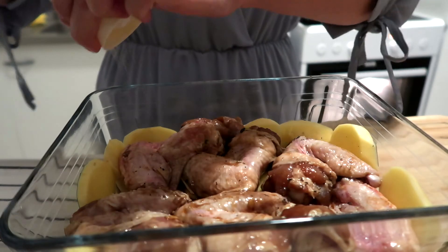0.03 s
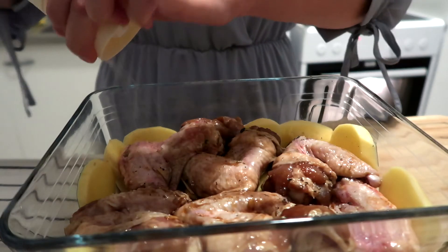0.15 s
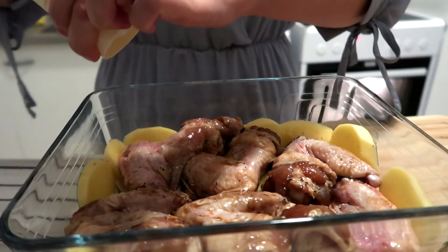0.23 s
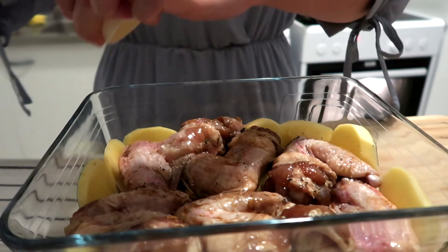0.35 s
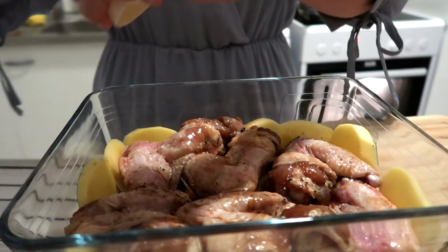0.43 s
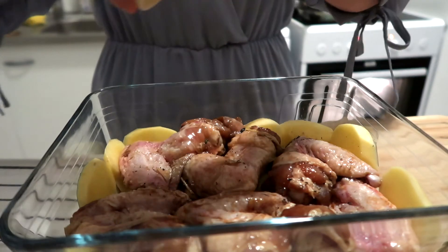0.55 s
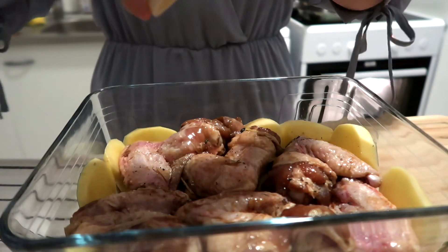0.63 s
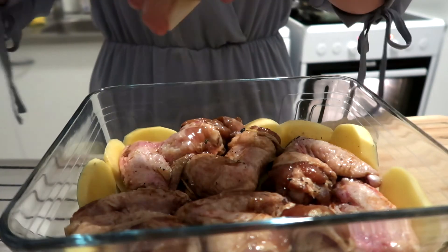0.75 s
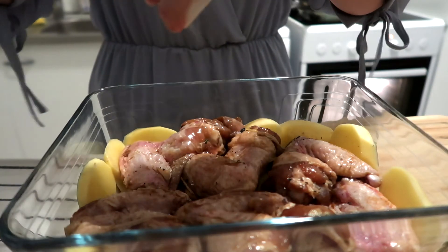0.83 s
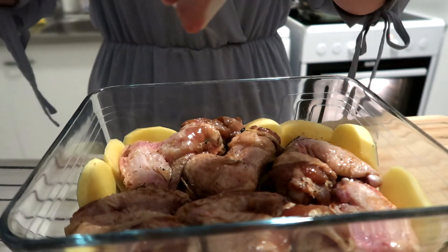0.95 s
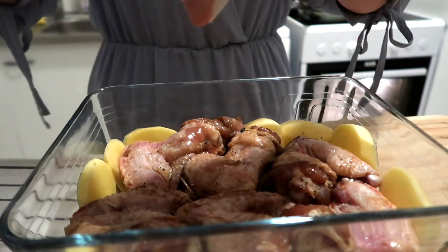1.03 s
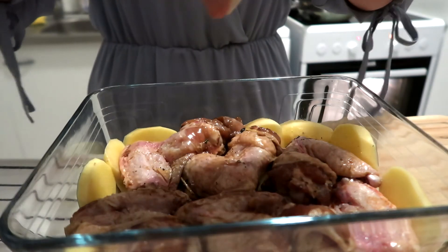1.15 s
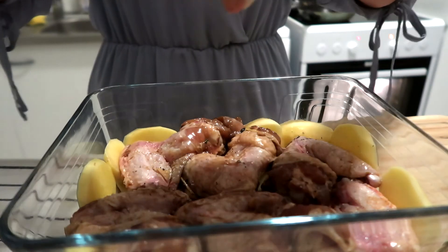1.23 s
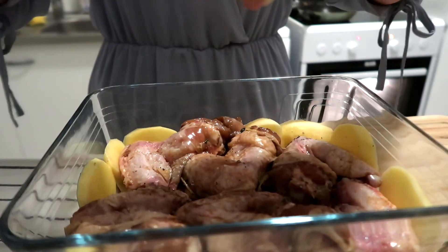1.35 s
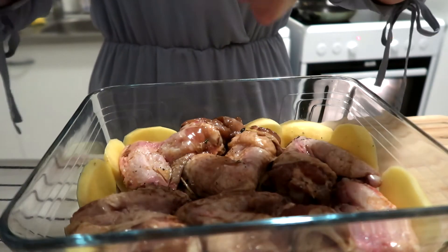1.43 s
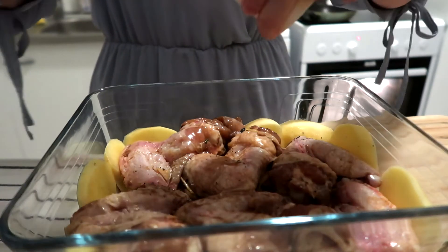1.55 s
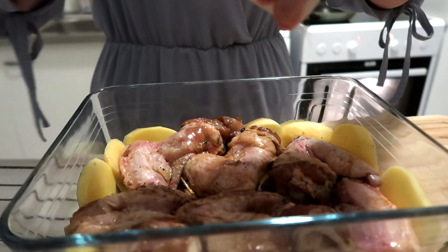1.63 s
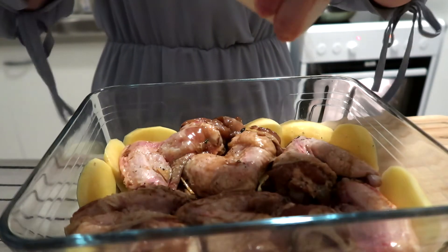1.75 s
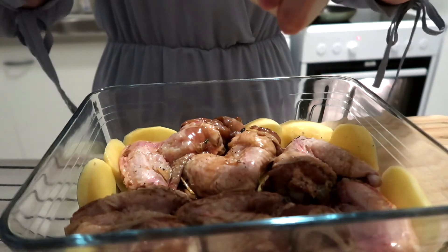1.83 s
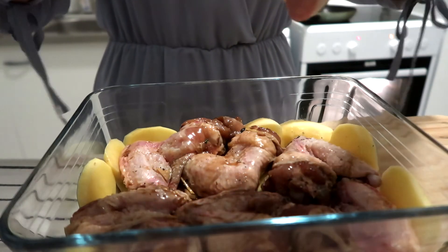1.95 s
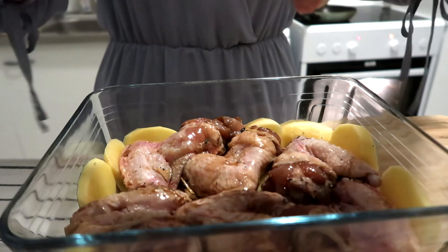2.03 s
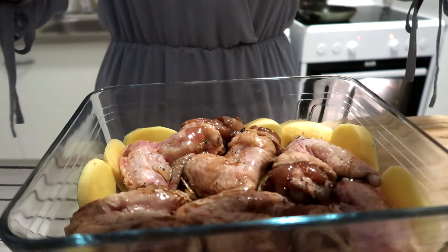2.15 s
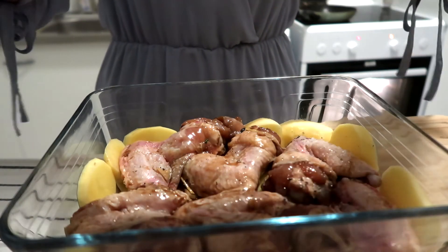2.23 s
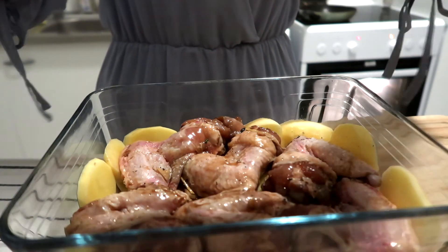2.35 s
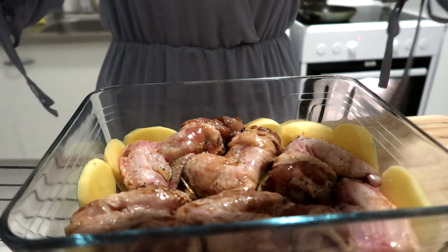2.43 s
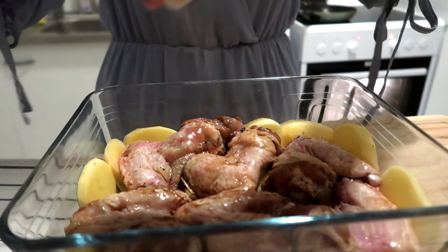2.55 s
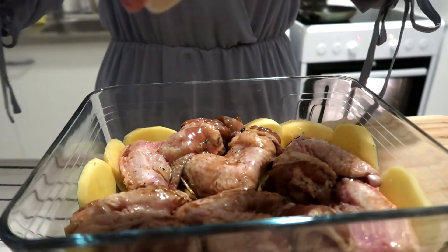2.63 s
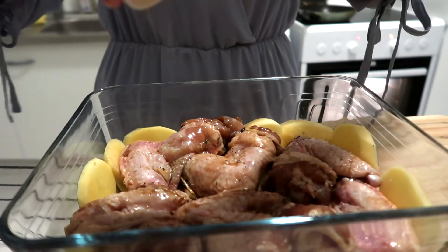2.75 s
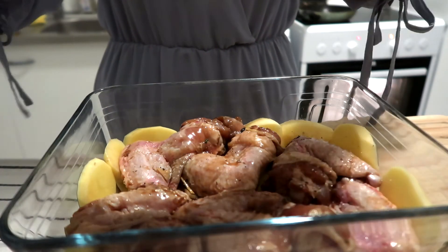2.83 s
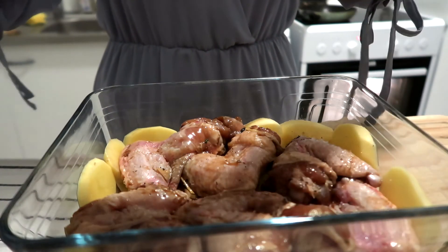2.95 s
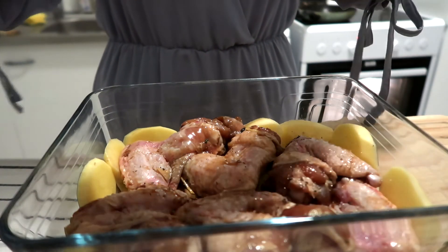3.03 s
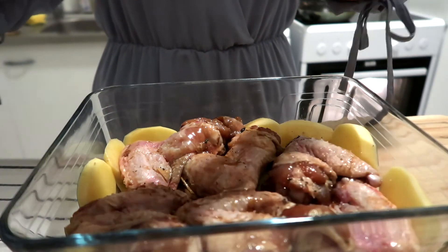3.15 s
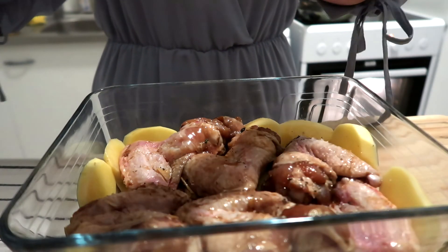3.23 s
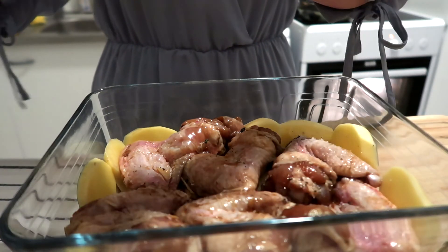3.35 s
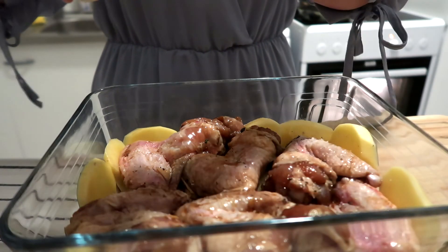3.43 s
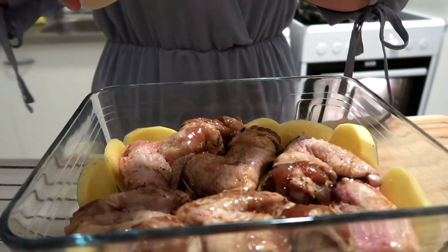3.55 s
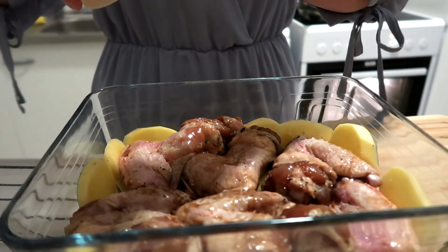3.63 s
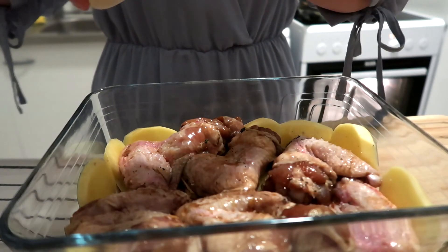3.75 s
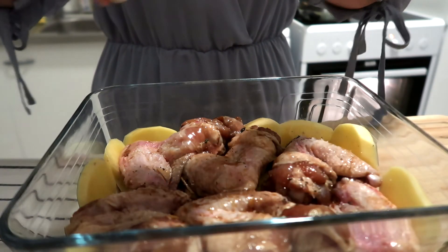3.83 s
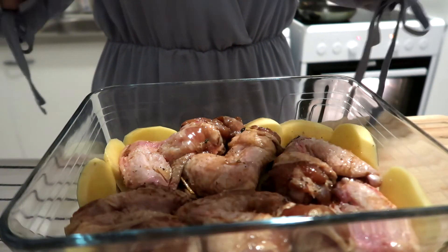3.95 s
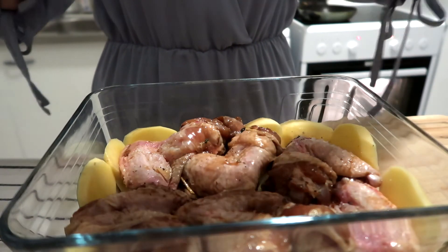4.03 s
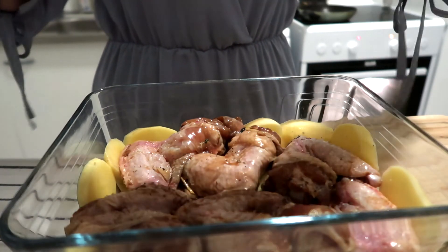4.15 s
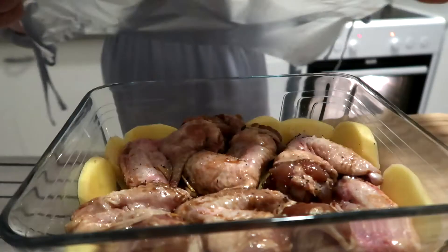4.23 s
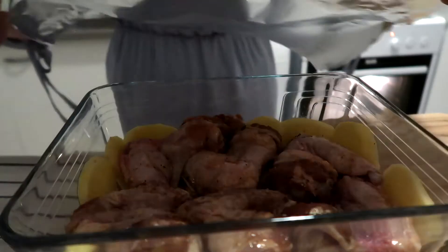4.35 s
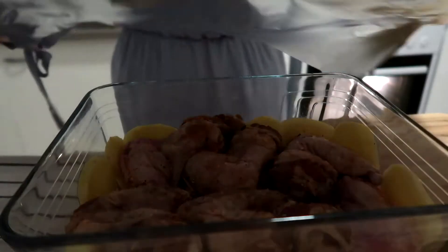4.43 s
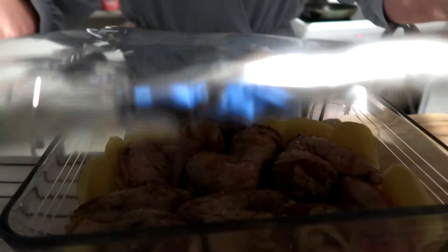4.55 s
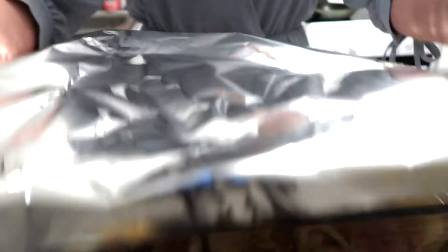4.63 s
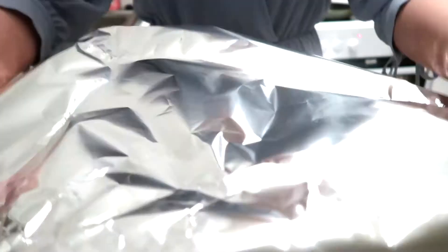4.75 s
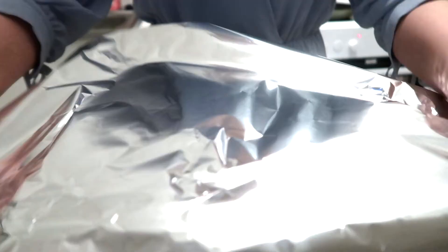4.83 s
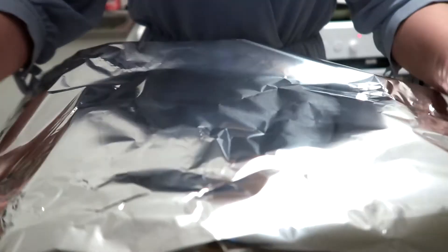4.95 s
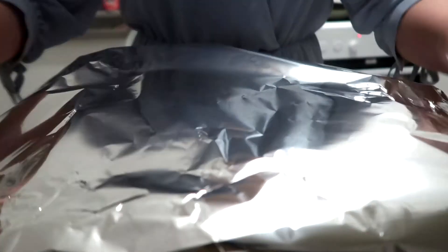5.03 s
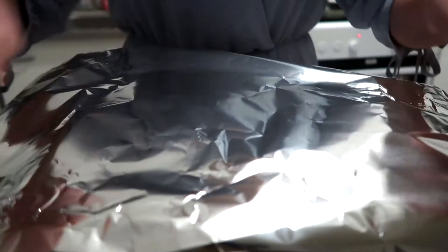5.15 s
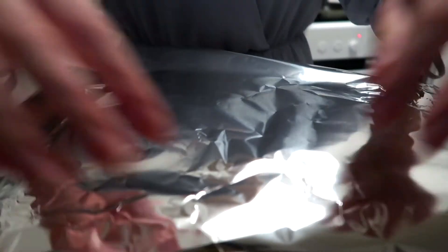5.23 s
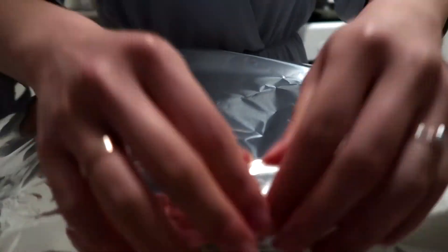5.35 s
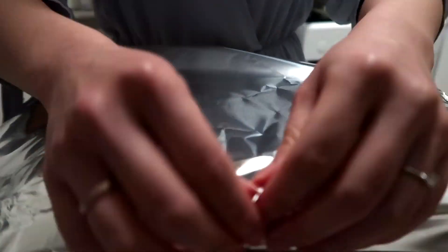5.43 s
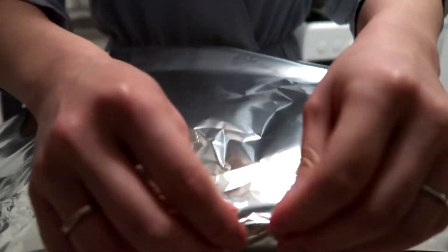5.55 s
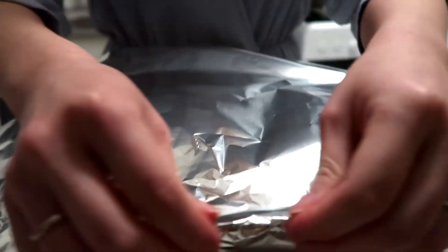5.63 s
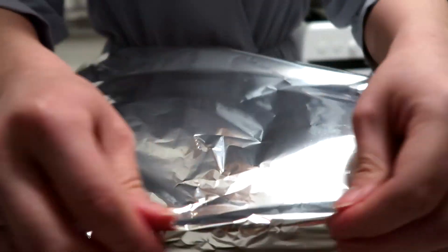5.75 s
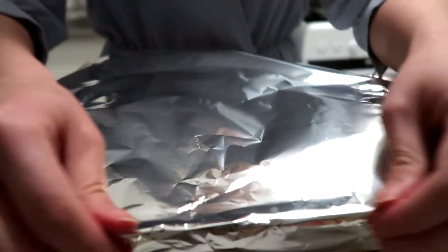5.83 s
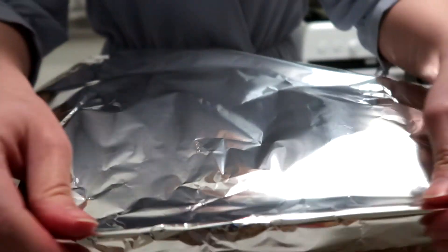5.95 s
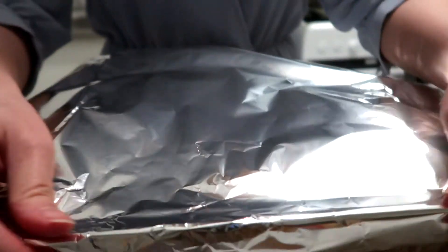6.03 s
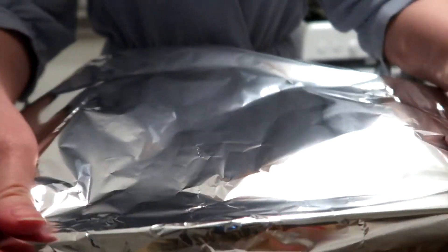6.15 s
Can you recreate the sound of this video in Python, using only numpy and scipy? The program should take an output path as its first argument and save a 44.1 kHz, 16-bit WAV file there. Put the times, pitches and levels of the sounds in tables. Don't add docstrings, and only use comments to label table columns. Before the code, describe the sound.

Close gritty cracking of a twisted spice mill in a kitchen, then abruptly bright, dense crackling of aluminium foil wrapped round a glass dish.

```python
import sys
import numpy as np
from scipy import signal
from scipy.fft import rfft, irfft, next_fast_len
from scipy.io import wavfile
from scipy.ndimage import uniform_filter1d

SR = 44100
rng = np.random.default_rng(int(sys.argv[2]) if len(sys.argv) > 2 else 0)


def voltage_ratio(level):
    return 10 ** (np.asarray(level, float) / 20)


def pcm_store(signal):
    levels = np.round(np.clip(np.atleast_2d(signal), -1, 1) * 32767)
    wavfile.write(sys.argv[1], SR, levels.astype(np.int16).T)


N = 273420
CHANGE_S = 4.196


def rms_one(x):
    return x / np.sqrt(np.mean(x ** 2) + 1e-20)


def in_time(rows, outside=-120):
    s, *columns = np.transpose(rows)
    return [np.interp(np.arange(N) / SR, s, c, outside, outside) for c in columns]


def colour(x, points):
    size = 4096
    hz = np.maximum(np.arange(size // 2 + 1) * SR / size, 1)
    point_hz, point_db = np.transpose(points)
    spectrum_db = np.interp(np.log(hz), np.log(point_hz), point_db)
    cepstrum = irfft(np.log(voltage_ratio(spectrum_db)))
    cepstrum[1:size // 2] *= 2
    cepstrum[size // 2 + 1:] = 0
    impulse = irfft(np.exp(rfft(cepstrum)))
    return signal.fftconvolve(x, impulse)[:len(x)]


def band(x, low_hz, high_hz):
    edges = [low_hz, min(high_hz, .45 * SR)]
    return signal.sosfilt(signal.butter(2, edges, "band", fs=SR, output="sos"), x)


def below(x, hz):
    return signal.sosfiltfilt(signal.butter(2, hz, fs=SR, output="sos"), x)


def resonate(x, hz, width_hz):
    r = np.exp(-np.pi * width_hz / SR)
    poles = [1, -2 * r * np.cos(2 * np.pi * hz / SR), r * r]
    return signal.lfilter([(1 - r * r) / 2, 0, (r * r - 1) / 2], poles, x)


def drift(rate_hz):
    r = np.exp(-2 * np.pi * rate_hz / SR)
    settle = 9000
    noise = rng.standard_normal(N + settle)
    return rms_one(signal.lfilter([1], [1, -2 * r, r * r], noise)[settle:])


def grains(per_s, spread_db, low_hz, high_hz, cycles, hiss, patchy_db, count):
    sizes = voltage_ratio(spread_db * np.minimum(rng.exponential(1, N), 5)) * rng.choice([-1, 1], N)
    struck = rng.random(N) < per_s / SR
    clicks = rms_one(sizes * struck / np.sqrt(per_s))
    dealt = rng.integers(0, count, N)
    white = rng.standard_normal((2, N)) / np.sqrt(count)
    patches = voltage_ratio(patchy_db * drift(22.8))
    out = 0
    for k, hz in enumerate(np.geomspace(low_hz, min(high_hz, .4 * SR), count)):
        r = voltage_ratio(-60 * hz / (cycles * SR))
        w = 2 * np.pi * hz / SR
        own_patches = np.roll(patches, k * N // count)
        push = (clicks * (dealt == k) + hiss * white[k % 2]) * own_patches + 1e-18
        out = out + (1 - r * r) * signal.lfilter([1, 0, -1], [1, -2 * r * np.cos(w), r * r], push)
    return rms_one(out)


def strokes(starts, holds, levels_db, attack_s, fade_db_per_s):
    hop = 96
    t = np.arange(0, N + hop, hop) / SR - np.array(starts)[:, None]
    swell = np.clip(t / attack_s, 0, 1) ** 2
    fade_db = fade_db_per_s * np.maximum(t - attack_s - np.array(holds)[:, None], 0)
    efforts = swell * voltage_ratio(np.array(levels_db)[:, None] - fade_db)
    gain = np.sqrt(np.sum(efforts ** 2, axis=0))
    return np.interp(np.arange(N) / hop, np.arange(len(gain)), gain)


def add(out, s, burst):
    i = max(round(s * SR), 0)
    out[i:i + len(burst)] += burst[:N - i]


def peak_one(x):
    return x / np.abs(x).max()


def ping(hz, cycles, rise_s):
    t = np.arange(round(SR * (cycles / hz + 4 * rise_s))) / SR
    return peak_one(np.sin(2 * np.pi * hz * t) * (1 - np.exp(-t / rise_s)) * voltage_ratio(-60 * t * hz / cycles))


def puff(noise, low_hz, high_hz, t60, rise_s):
    t = np.arange(len(noise)) / SR
    return peak_one(band(noise * (1 - np.exp(-t / rise_s)) * voltage_ratio(-60 * t / t60), low_hz, high_hz))


def air():
    # (f/Hz, level/dB)
    rumble_spectrum = [(12, -27), (20, -6), (119, -2.5), (263, -6.5), (346, -8.5), (687, -15), (809, -16.5),
                       (1400, -17.5), (1650, -19.5), (2560, -20.5), (11600, -37), (12500, -35),
                       (14000, -39)]
    # (f/Hz, level/dB)
    hiss_spectrum = [(12, -65), (20, -39), (140, -7.5), (419, -6.5), (599, -12), (3100, -21), (5670, -29),
                     (8090, -33), (9280, -31), (12900, -33), (14000, -32)]
    # (f/Hz, rms level/dB)
    hum = [(50, -67), (100, -64), (13000, -91)]
    t = np.arange(N) / SR
    settle = 4096
    mid = voltage_ratio(-54.5) * rms_one(colour(rng.standard_normal(N + settle), rumble_spectrum)[settle:])
    for hz, db in hum:
        mid = mid + voltage_ratio(db) * np.sqrt(2) * np.sin(2 * np.pi * hz * t)
    side = voltage_ratio(-56.5) * rms_one(colour(rng.standard_normal(N + settle), hiss_spectrum)[settle:])
    return np.array([mid + side, mid - side]) * voltage_ratio(-11.5 * (t > CHANGE_S))


def kitchen(x):
    # (f/Hz, t60/s)
    decay = [(300, 0.32), (1500, 0.3), (5000, 0.27), (12000, 0.2)]
    edges_hz = [100, 700, 3000, 8000, 16000]
    t = np.arange(SR // 2) / SR
    tail = 0
    for (hz, t60), low, high in zip(decay, edges_hz, edges_hz[1:]):
        envelope = voltage_ratio(-60 * t / t60) * (1 - np.exp(-t / 0.0004))
        tail = tail + band(rng.standard_normal(len(t)), low, high) * envelope
    return signal.fftconvolve(x, tail / np.sqrt(np.sum(tail ** 2)))[:N]


def ports(x):
    # (f/Hz, side minus mid level/dB)
    difference = [(60, -36), (110, -32), (200, -20), (380, -17), (700, -23), (1290, -24), (2380, -20),
                  (4400, -6), (8120, 0), (15000, 1)]
    scatter = rng.standard_normal(400) * voltage_ratio(-60 * np.arange(400) / SR / .006)
    scattered = signal.fftconvolve(x, scatter / np.sqrt(np.sum(scatter ** 2)))
    analytic = signal.hilbert(scattered, next_fast_len(N + 400))[:N]
    wandering = np.real(analytic * np.exp(3j * drift(29.0)))
    side = colour(wandering, difference)
    return np.array([x + side, x - side])


def knocks():
    # (t/s, peak level/dB, f/Hz, tap relative level/dB)
    jolts = [(0.017, -34, 145, 11.5), (0.082, -28.5, 247, 4.5), (0.13, -32, 141, 14.5),
             (0.673, -48, 86.1, -7), (0.774, -33.5, 123, -19), (0.876, -39, 108, 4.5),
             (1.478, -33.5, 254, 7), (1.591, -45, 254, 18), (2.415, -36, 86, 1), (2.471, -32.5, 152, 2),
             (2.644, -42, 121, 5), (3.245, -45, 128, 11.5), (3.688, -38.5, 264, -0.5),
             (4.215, -46, 453, -19), (4.29, -28, 450, -13), (4.252, -42, 129, 7), (4.52, -39, 129, 10),
             (4.77, -28, 207, 12.5), (4.827, -47, 226, 29), (4.944, -37, 119, -55), (5.461, -31, 148, 4),
             (5.528, -39.5, 157, 19.5), (5.797, -36, 233, 4), (5.858, -33, 252, -9), (6.037, -44, 151, 21)]
    out = np.zeros(N)
    for (s, db, hz, tap_db), noise in zip(jolts, rng.standard_normal((len(jolts), 3000))):
        add(out, s, voltage_ratio(db - 8.5) * ping(hz, 26.3, 0.0012))
        add(out, s, voltage_ratio(db + tap_db - 6.0) * puff(noise, 456, 745, 0.082, 0.0012))
    return out


def cracks():
    # (t/s, peak level/dB, body f/Hz, splinters relative level/dB)
    twist_1 = [(0.006, -15, 2020, -12), (0.011, -18, 1600, -5.5), (0.025, -14, 2070, -11),
               (0.038, -22, 2100, -12), (0.072, -12, 1540, -43), (0.082, -14, 1920, -30),
               (0.089, -23.5, 1950, -3.5), (0.096, -22, 1730, -24), (0.106, -26, 2380, -1),
               (0.123, -26.5, 1600, -7), (0.127, -16, 2300, -9), (0.135, -16.5, 1220, -29),
               (0.14, -17.5, 1600, -18), (0.332, -39, 1310, -27)]
    twist_2 = [(0.617, -23, 1340, -25), (0.66, -24.5, 2680, -19), (0.665, -26.5, 2150, -12),
               (0.683, -29, 1420, -5), (0.687, -21, 1730, -17), (0.695, -23, 1710, -13),
               (0.727, -18, 1600, -12), (0.768, -13.5, 1650, -17), (0.776, -14.5, 1750, -22),
               (0.783, -11.5, 1640, -11), (0.786, -21.5, 1620, -16), (0.817, -22.5, 2510, -6),
               (0.823, -19, 1590, -9), (0.836, -24, 1950, -15), (0.88, -16, 2380, -8),
               (0.892, -17.5, 1610, -24), (0.92, -24.5, 2160, -7), (0.946, -26, 1770, -19)]
    twist_3 = [(1.45, -18, 2020, -43), (1.454, -32.5, 2560, -3), (1.462, -30, 2570, -4),
               (1.485, -16, 1130, -28), (1.489, -22.5, 2150, -10), (1.517, -29, 2400, -6),
               (1.576, -26, 1660, -9), (1.583, -16.5, 1560, -15), (1.595, -17, 2060, -23),
               (1.612, -13.5, 1620, -18), (1.617, -20, 2150, -8), (1.628, -19, 1820, -18),
               (1.638, -23.5, 1140, -11), (1.68, -18, 1190, -19), (1.705, -42, 1820, -17)]
    twist_4 = [(2.302, -31.5, 1530, -5), (2.312, -31, 1600, -4), (2.324, -28.5, 2640, -18),
               (2.335, -27, 2940, -17), (2.348, -29.5, 2090, -3.5), (2.374, -25.5, 1960, -8),
               (2.382, -26.5, 2190, -7), (2.403, -15, 2980, -12.5), (2.411, -24.5, 2560, -4),
               (2.425, -23.5, 1560, -6), (2.44, -19, 2110, -25), (2.453, -21, 2930, -8),
               (2.462, -18.5, 1490, -28), (2.491, -13.5, 2820, -49), (2.496, -16, 1600, -33),
               (2.504, -22.5, 3060, -8), (2.521, -23.5, 3000, -7), (2.529, -23, 1600, -18),
               (2.533, -18, 1600, -25), (2.638, -26, 1770, -0.5), (2.646, -23.5, 1370, -8),
               (2.655, -18.5, 3270, -27), (2.673, -22, 1680, -17), (2.747, -29.5, 1520, -33)]
    twist_5 = [(3.22, -29.5, 2160, -3.5), (3.248, -35, 3000, 3), (3.255, -23.5, 2120, -4.5),
               (3.26, -24, 1500, -12), (3.265, -29.5, 2150, -9), (3.405, -40.5, 1950, -7),
               (3.448, -28, 1820, -7.5), (3.582, -43, 1860, -3.5), (3.659, -40.5, 2180, -5),
               (3.678, -18, 2150, -43), (3.674, -32, 2150, -6), (3.698, -26, 2340, -8),
               (3.721, -43, 1980, -29), (4, -44.5, 1360, -20)]
    # (f/Hz, width/Hz, level/dB)
    body_modes = [(1130, 116, 0), (1600, 150, 3), (2150, 390, 0.5), (2560, 74, -5), (3060, 130, 1)]
    # (f/Hz, width/Hz, level/dB)
    burr_modes = [(4150, 200, -1), (5050, 170, -1), (5370, 200, 5), (5580, 83, -6)]
    rise_s, t60 = 0.00089, 0.027
    favour_db_per_octave = 12.5
    grip_shift = .04
    rows = twist_1 + twist_2 + twist_3 + twist_4 + twist_5
    t = np.arange(1800) / SR
    crunch = (1 - np.exp(-t / rise_s)) ** 2 * voltage_ratio(-60 * t / t60)
    out = np.zeros(N)
    for s, db, hz, splinter_db in rows:
        body_noise, burr_noise, chip_noise = rng.standard_normal((3, 1800))
        body = burr = 0
        for f, width, mode_db in body_modes:
            gain = voltage_ratio(mode_db - favour_db_per_octave * abs(np.log2(f / hz)))
            detuned = f * (1 + grip_shift * body_noise[-1 - round(f) % 99])
            body = body + gain * resonate(body_noise * crunch, detuned, width)
        for f, width, mode_db in burr_modes:
            burr = burr + voltage_ratio(mode_db) * resonate(burr_noise * crunch, f, width)
        crush = puff(chip_noise[::-1], 0.73 * hz, 1.83 * hz, 0.04, 0.0022)
        fine_db = db - 13.5 + 0.48 * splinter_db
        add(out, s + .0006, voltage_ratio(db - 2.0) * ping(hz, 8.7, 0.00074))
        add(out, s - .0008, voltage_ratio(db - 4.5) * peak_one(body))
        add(out, s - .0008, voltage_ratio(db - 11.0) * crush)
        add(out, s - .0008, voltage_ratio(db + splinter_db + 0.9) * peak_one(burr))
        add(out, s, voltage_ratio(fine_db) * puff(chip_noise, 10500, 12800, 0.067, 0.0017))
    return out


def mill():
    # (t/s, hold/s, grit level/dB, falling crumbs level/dB)
    twists = [(-.02, 0.16, -34, -48.5), (0.647, 0.035, -37, -62), (0.757, 0.19, -41.5, -54),
              (1.471, 0.027, -29.5, -46), (1.569, 0.067, -28.5, -46), (1.645, 0.026, -33, -52),
              (2.286, 0.038, -46, -75), (2.397, 0.13, -37, -57), (2.629, 0.026, -37.5, -70),
              (3.21, 0.024, -49.5, -61), (3.67, .04, -64, -82)]
    # (t/s, peak level/dB, f/Hz)
    crumbs = [(1.035, -33, 11200), (1.122, -34, 12200), (1.2032, -41, 11100), (1.725, -20, 10700),
              (1.7414, -18, 10700), (1.768, -21, 10700), (1.831, -26.5, 11300), (1.8424, -47, 10700),
              (2.2628, -34.5, 6800), (2.5795, -46, 10500), (2.761, -34, 11200), (2.816, -34, 10900),
              (2.8294, -39, 6010), (2.9463, -39, 6050), (2.985, -28, 11000), (3.079, -33, 11000),
              (3.3273, -33, 13500), (3.399, -32.5, 5500), (3.5827, -30, 12200), (3.647, -37, 5530),
              (3.93, -29.5, 6170), (4.0303, -25.5, 11100), (4.08, -25.5, 11100), (4.152, -34, 10800)]
    # (t/s, level/dB)
    dust = [
        (3.88, -65),
        (3.99, -55),
        (4.17, -66),
    ]
    # (f/Hz, level/dB)
    grit_spectrum = [(120, -65), (200, 3), (371, -6), (618, -3), (874, -12), (1380, 1), (2750, 0.5),
                     (3010, -1), (4410, -5), (5200, -4.5), (6590, -14.5), (13200, -13), (15500, -25)]
    # (f/Hz, level/dB)
    sift_spectrum = [(2650, -21), (4500, -16.5), (5980, -5.5), (7100, -13.5), (9290, -13), (10800, -3),
                     (13100, -14), (15500, -8)]
    fall_s, sift_attack_s = 0.067, 0.13
    start, hold, grit_db, sift_db = np.transpose(twists)
    grit_gain = strokes(start, hold, grit_db, attack_s=0.0057, fade_db_per_s=212)
    sift_gain = strokes(start + fall_s - sift_attack_s, hold, sift_db, sift_attack_s, fade_db_per_s=161)
    sift_gain = sift_gain + voltage_ratio(in_time(dust)[0])
    grit = grains(4000 * voltage_ratio(2.5 * drift(40)), 4.7, 295, 6700, 1.9, 0.87, 7.1, count=20)
    sift = grains(3000 * voltage_ratio(4.6 * drift(34)), 2.5, 4600, 17000, 13.0, 0.69, 3.5, count=8)
    out = cracks()
    out += grit_gain * rms_one(colour(grit, grit_spectrum)) * voltage_ratio(1.7 * drift(41) - 2.5)
    out += sift_gain * rms_one(colour(sift, sift_spectrum))
    for (s, db, hz), noise in zip(crumbs, rng.standard_normal((len(crumbs), 700))):
        add(out, s, voltage_ratio(db - 11.0) * ping(hz, 33.0, 0.00038))
        add(out, s, voltage_ratio(db - 16.0) * puff(noise, 0.21 * hz, 4.6 * hz, 0.053, 0.0014))
    return out


def sheet_part(level_db, weight_share, fade_db_per_s, firm_share):
    # (t/s, hold/s, crinkle level/dB, weight on the sheet/dB)
    moves = [(4.129, 0.17, -33.5, 5), (4.36, 0.066, -39.5, 5), (4.479, 0.015, -27, -2),
             (4.501, 0.01, -21.5, -4.5), (4.54, 0.017, -22, -3.5), (4.585, 0.0087, -29, 1.5),
             (4.648, 0.02, -36.5, 9), (4.667, 0.005, -30, -1), (4.695, 0.017, -19.5, -3.5),
             (4.751, 0.077, -18.5, -0.5), (4.892, 0.088, -25, 1.5), (5.037, 0.038, -32.5, 6.5),
             (5.12, 0.011, -57, 2), (5.227, 0.1, -67, 23), (5.315, 0.11, -49.5, 21),
             (5.417, 0.098, -23.5, 4), (5.519, 0.15, -24.5, 2.5), (5.712, 0.0074, -39, 13),
             (5.769, 0.11, -27.5, 4.5), (5.829, 0.26, -24.5, 4), (6.03, 0.16, -27.5, 4),
             (6.162, .03, -21.5, 3)]
    s, hold, db, weight_db = np.transpose(moves)
    firm_db = db + 25
    part_db = db + level_db + weight_share * weight_db + firm_share * firm_db
    return strokes(s, hold, part_db, 0.031, fade_db_per_s)


def snaps_and_pops():
    # (t/s, peak level/dB, f/Hz)
    snaps = [(4.2637, -11.5, 2180), (4.4135, -14.5, 2130), (4.5181, -26, 5140), (4.5385, -3.5, 5700),
             (4.5663, -6.5, 2880), (4.61, -14, 4350), (4.6974, -8, 3800), (4.7754, -33, 3430),
             (4.7897, -1.5, 2470), (4.8286, 0, 3200), (5.0002, -12, 2460), (5.0945, -10, 3150),
             (5.165, -18, 5090), (5.3684, -30, 2320), (5.4554, -6.5, 2340), (5.4701, -4.5, 2140),
             (5.5225, -10, 1600), (5.5347, -7, 2430), (5.563, -5, 2290), (5.5784, -12, 2530),
             (5.6614, -6.5, 2200), (5.7477, -6.5, 2140), (5.7887, -14, 2350), (5.8154, -9.5, 2650),
             (5.8452, -9.5, 2530), (5.8714, -6, 2400), (5.9462, -6, 2380), (6.0394, -6, 2490),
             (6.109, -10, 2510), (6.1838, -7, 2150)]
    # (t/s, peak level/dB, f/Hz)
    pops = [(4.223, -24, 3280), (4.244, -33, 1320), (4.263, -31, 1270), (4.264, -30.5, 520),
            (4.416, -46, 1080), (4.516, -25.5, 1700), (4.538, -21, 4180), (4.583, -16.5, 3210),
            (4.637, -27, 3140), (4.711, -26, 1250), (4.719, -19, 3140), (4.724, -27, 1290),
            (4.724, -23, 2300), (4.737, -22, 1340), (4.774, -20, 1230), (4.79, -26, 690),
            (4.789, -22, 5270), (4.833, -27, 6890), (4.839, -18, 4800), (4.84, -22, 1390),
            (4.841, -23, 2450), (4.846, -20, 1240), (4.857, -25, 467), (4.951, -26, 2140),
            (4.955, -24, 1230), (5.004, -21.5, 3060), (5.064, -25.5, 1070), (5.09, -26.5, 1530),
            (5.164, -37, 5170), (5.25, -41, 1220), (5.448, -18, 4300), (5.471, -23, 1160),
            (5.482, -20, 2150), (5.538, -23, 1200), (5.564, -26, 1250), (5.578, -17.5, 1235),
            (5.627, -21, 1510), (5.628, -25, 2280), (5.669, -25, 1150), (5.686, -19.5, 1280),
            (5.706, -19.5, 2150), (5.746, -28, 4500), (5.748, -29.5, 605), (5.749, -24, 1660),
            (5.789, -24, 1600), (5.789, -23, 2370), (5.791, -28, 517), (5.817, -26, 1290),
            (5.891, -29, 1160), (5.926, -18, 2200), (5.995, -23, 1550), (6.049, -24, 1670),
            (6.084, -29, 3530), (6.109, -29, 1280), (6.128, -25, 4000), (6.184, -22, 4180)]
    out = np.zeros(N)
    for (s, db, hz), noise in zip(snaps, rng.standard_normal((len(snaps), 2400))):
        add(out, s, voltage_ratio(db - 10.5) * ping(hz, 28.0, 0.0005))
        add(out, s, voltage_ratio(db - 10.0) * puff(noise, 1300, 12800, 0.12, 0.00064))
    for (s, db, hz), noise in zip(pops, rng.standard_normal((len(pops), 900))):
        add(out, s, voltage_ratio(db + 1.0) * ping(hz, 4.7 + 0.0095 * hz, 0.0014))
        add(out, s, voltage_ratio(db - 3.0) * puff(noise, 1300, 13000, 0.026, 0.00073))
    return out


def foil():
    # (f/Hz, level/dB)
    sheet_spectrum = [(35, -51), (60, -2), (142, -7), (345, -6), (604, 1), (877, -5), (1160, 0),
                      (1810, 0.5), (2560, 7.5), (5160, 5), (9030, -7), (12800, -7), (15800, -22)]
    # (f/Hz, width/Hz, gain/dB)
    cavity = [(1170, 110, 2), (1630, 110, 2.5), (2240, 200, 1.5), (2470, 120, 0)]
    creases = grains(6000 * voltage_ratio(2.5 * drift(40)), 1.9, 100, 16000, 12.0, .7, 2.4, count=32)
    sheet = colour(creases, sheet_spectrum) * voltage_ratio(.8 * drift(50))
    laid = np.clip((np.arange(N) / SR - 4.8) / 0.91, 0, 1)
    ringing = sum((voltage_ratio(db) - 1) * resonate(sheet, hz, width) for hz, width, db in cavity)
    sheet = sheet + laid * ringing
    low, middle, high = below(sheet, 900), below(sheet, 1800), below(sheet, 7500)
    boom = sheet_part(-20.5, weight_share=0.7239, fade_db_per_s=78, firm_share=0.02)
    drum = sheet_part(-13.5, weight_share=1.2564, fade_db_per_s=62, firm_share=0.5)
    crease = sheet_part(-3.5, weight_share=-0.46, fade_db_per_s=124, firm_share=-0.61)
    sheen = sheet_part(-3.5, weight_share=-0.5, fade_db_per_s=205, firm_share=-0.26)
    out = boom * voltage_ratio(2.0 * drift(6.8)) * rms_one(low)
    out += drum * voltage_ratio(1.0 * drift(40)) * rms_one(middle - low)
    out += crease * voltage_ratio(0.14 * drift(33.0)) * rms_one(high - middle)
    out += sheen * voltage_ratio(0.33 * drift(10)) * rms_one(sheet - high)
    return out + snaps_and_pops()


def scene():
    grinding, covering = mill(), foil()
    before = np.arange(N) < CHANGE_S * SR
    grinding = (grinding + voltage_ratio(-12.0) * kitchen(grinding)) * before
    covering = covering * ~before
    covering = covering + voltage_ratio(-12) * kitchen(covering)
    return ports(grinding + covering + knocks()) + air()


def treble_gate(x):
    # (lower edge f/Hz, closing level/dB)
    gates = [(15100, -56), (14400, -53), (13600, -54), (13000, -58), (11200, -61), (9300, -66)]
    after = np.arange(N) > CHANGE_S * SR
    for hz, gate_db in gates:
        treble = signal.sosfiltfilt(signal.butter(10, hz, "high", fs=SR, output="sos"), x)
        power = uniform_filter1d(np.mean(treble ** 2, axis=0), size=900)
        level_db = 10 * np.log10(power + 1e-12)
        shut = np.clip((gate_db - level_db) / 2 + .5, 0, 1)
        x = x - treble * shut * after
    return x


def band_limit(x):
    return signal.sosfilt(signal.butter(12, 15960, fs=SR, output="sos"), x)


def record(dry):
    rounded = treble_gate(.9 * np.tanh(dry / .9))
    low_pass = signal.cheby2(16, 60, 1.003 * 15960, fs=SR, output="sos")
    finished = signal.sosfilt(low_pass, rounded)
    return band_limit(finished)


dry = scene()
out = record(dry)
pcm_store(out)
```